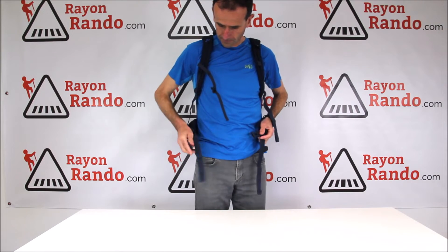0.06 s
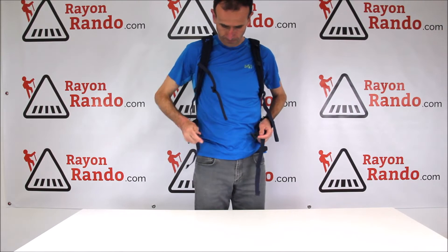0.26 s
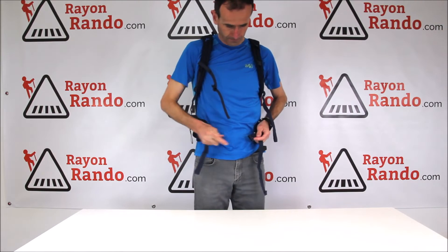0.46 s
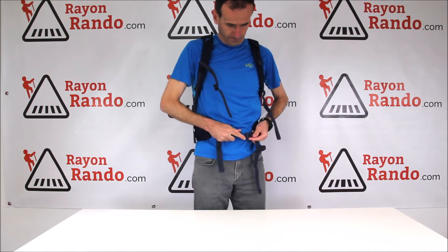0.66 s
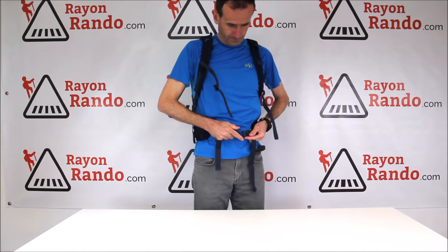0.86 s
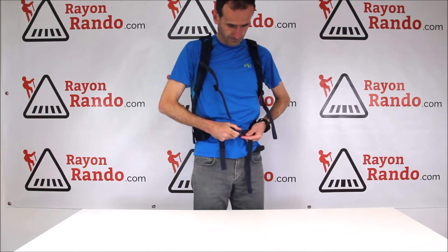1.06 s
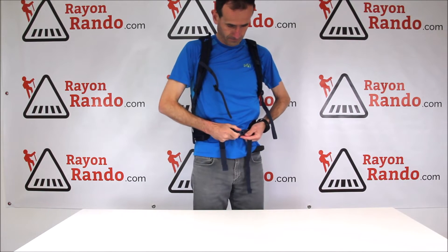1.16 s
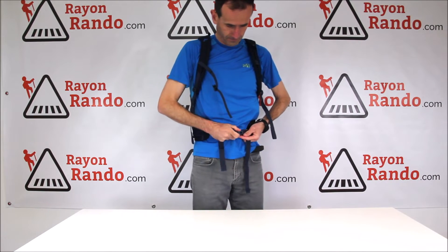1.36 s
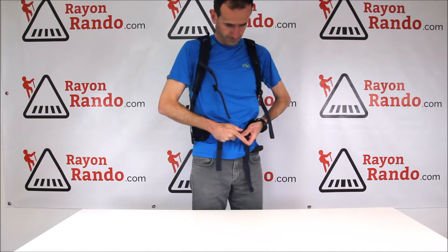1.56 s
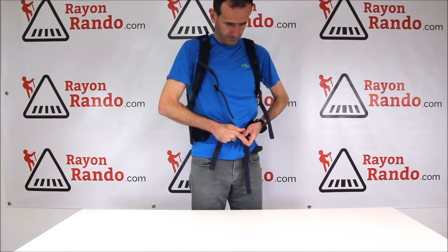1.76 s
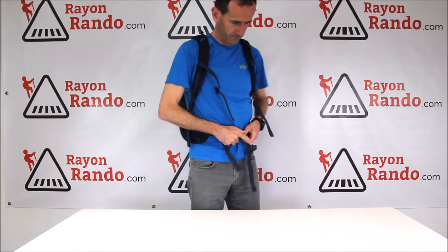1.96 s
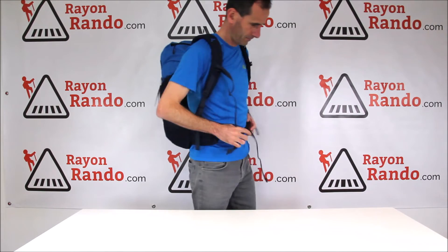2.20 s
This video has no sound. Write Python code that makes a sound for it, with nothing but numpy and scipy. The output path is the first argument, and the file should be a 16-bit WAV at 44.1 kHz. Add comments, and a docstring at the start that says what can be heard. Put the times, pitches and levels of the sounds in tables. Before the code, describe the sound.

Quiet fabric rustle and light plastic knocks lead to a sharp, clattering buckle snap, much louder than the rest; its short room echo fades into strap rustle and a tiny squeak, over low rumble and faint hiss.

```python
"""Webbing and clothes rustle softly in a bare room as someone draws a backpack's hip belt together.
Buckle halves tap and scuff as they line up, then the plastic prongs spring home in a burst of bright cracks.
The room rings on while the recorder's gain control ducks and recovers; the belt shifts with a tiny squeak.
Contacts are filtered clicks, fabric is grainy coloured noise, squeaks are resonant noise, bumps are low sines.
A decaying noise tail gives the room; rumble and microphone hiss lie underneath."""
import sys
import numpy as np
from scipy import signal
from scipy.fft import rfft, irfft
from scipy.io import wavfile
from scipy.ndimage import uniform_filter1d, minimum_filter1d

SR = 44100
rng = np.random.default_rng(int(sys.argv[2]) if len(sys.argv) > 2 else 0)


def persist_wave(psi):
    """Save psi, clipped to +-1, as 16-bit WAV."""
    counts = np.round(np.clip(psi, -1, 1) * 32767).astype(np.int16)
    wavfile.write(sys.argv[1], SR, np.atleast_2d(counts).T)


N = 98519  # samples in the scene

GRAINS_PER_S = 2500  # average rate of tiny slips in rustles and scuffs


def amp(db):
    """Decibels to gain."""
    return 10 ** (np.asarray(db) / 20)


def unit(x):
    """Scales to rms 1."""
    return x / np.sqrt(np.mean(x ** 2) + 1e-20)


def read(points, hz):
    """Reads a table on a log-frequency axis."""
    f, value = np.transpose(points)
    return np.interp(np.log(hz + 1), np.log(f + 1), value)


def add(mix, s, sound):
    """Mixes a sound in at time s, cut at the end of the scene."""
    part = mix[round(s * SR):][:len(sound)]
    part += sound[:len(part)]


def colour(x, points):
    """Gives a steady sound a spectrum."""
    hz = np.fft.rfftfreq(len(x), 1 / SR)
    return irfft(rfft(x) * amp(read(points, hz)), len(x))


def causal(x, db_at, size=4096):
    """Minimum-phase filter: shapes a click without smearing its attack backwards."""
    hz = abs(np.fft.fftfreq(size, 1 / SR))
    log_gain = np.log(amp(db_at(hz)))
    impulse = np.fft.ifft(np.exp(np.conj(signal.hilbert(log_gain)))).real
    return signal.fftconvolve(x, impulse[:size // 2])[:len(x)]


def octaves(hz, centre):
    """Distance from a centre frequency in octaves, held below 100 Hz."""
    return np.log2(np.maximum(hz, 100) / centre)


def burst(decay_s, size=4096):
    """A contact: one sharp pulse and a quickly dying chatter, energy about 1."""
    pulse_share = 0.14  # of the energy
    chatter = rng.choice([-1., 1.], size) * np.exp(-np.arange(size) / SR / decay_s)
    chatter[0] = 0
    chatter /= np.linalg.norm(chatter)
    pulse = signal.unit_impulse(size)
    return np.sqrt(pulse_share) * pulse + np.sqrt(1 - pulse_share) * chatter


def snap():
    """Prongs spring out and halves seat: short cracks coloured by the buckle's damped resonances."""
    # Each row: start in seconds, level in dB relative to crack_db, brightness in dB per octave.
    impacts = [(1.602, 1, .5), (1.6041, -1.5, -1), (1.6061, -3, -2), (1.6081, -3, 3.5), (1.6098, -11.5, 1)]
    # Resonances of the buckle. Each row: frequency in Hz, width in Hz, lift in dB.
    resonances = [(980, 150, 4), (1400, 350, 6), (2020, 220, 4), (3200, 500, 4), (3800, 400, 5),
                  (5180, 600, 7), (5450, 350, 6), (6320, 300, 5), (6850, 350, 5), (7500, 400, 4),
                  (10400, 400, 4), (12150, 500, 4), (14000, 400, 4), (14520, 400, 4)]
    # Basic spectrum of a crack. Each row: frequency in Hz, relative level in dB.
    crack_colour = [(60, -54), (200, -33), (400, -17.5), (800, -17), (1300, -10), (3000, -6), (6000, -2),
                    (9000, -1.5), (12000, 1), (15000, 3.5), (16200, -15)]
    crack_db, crack_decay_s = 14, 0.00096
    tilt_from_hz, tilt_pivot_hz = 960, 8300

    out = np.zeros(N)
    for s, db, tilt_db in impacts:
        def body(f):
            lift = 0
            for hz, width, lift_db in resonances:
                lift = lift + (amp(lift_db) - 1) / (1 + (2 * (f - hz) / width) ** 2)
            tilt = tilt_db * octaves(np.maximum(f, tilt_from_hz), tilt_pivot_hz)
            return read(crack_colour, f) + 20 * np.log10(1 + abs(lift)) + tilt
        crack = causal(burst(crack_decay_s), body)
        add(out, s, amp(crack_db + db) * crack)
    return out


def taps():
    """Fingers and buckle halves knock lightly, damped by the fingers into one resonance."""
    # Each row: start in seconds, level in dB (whole knock's energy), resonance in Hz, its width in Hz,
    # its strength in dB against the plain knock, treble rolloff in Hz.
    knocks = [(.591, -22, 640, 600, 14, 2500), (.614, -21.5, 2280, 1470, 24, 3970),
              (.708, -27, 900, 900, 0, 5000), (1.0801, -24.5, 2040, 1500, -4, 9000),
              (1.0839, -25, 1650, 500, 15, 5000), (1.0977, -23.5, 2730, 1200, 1, 8000),
              (1.3892, -17.5, 1216, 49.6, 25.5, 9000), (1.4865, -22, 2030, 1500, 4, 5000)]
    decay_s, low_hz = 0.0026, 349  # bass thins out below low_hz

    out = np.zeros(N)
    for s, db, hz, width, strength_db, dull_hz in knocks:
        def body(f):
            peak = 1 + amp(strength_db) / np.hypot(1, 2 * (f - hz) / width)
            treble = 1 / (1 + (f / dull_hz) ** 2)
            bass = (f + 1) / (f + low_hz)
            return 20 * np.log10(peak * treble * bass)
        knock = causal(burst(decay_s), body)
        add(out, s, amp(db) * knock / np.linalg.norm(knock))
    return out


def scuffs():
    """Webbing scrapes briefly on plastic: band-shaped random slips that rise fast and die away."""
    # Each row: start in seconds, rms level in dB before the fades, centre in Hz, decay constant in seconds.
    scrapes = [(0, -55, 2310, 0.042), (.592, -50, 606, 0.05), (.616, -45.5, 1940, .022),
               (1.085, -51.5, 1900, .015), (1.099, -51.5, 2860, 0.023), (1.395, -52.5, 644, 0.04),
               (1.489, -48.5, 3060, 0.018), (2.136, -47, 1570, 0.015)]
    width_octaves, rise_s = 0.93, 0.0044

    out, t = np.zeros(N), np.arange(SR // 4) / SR
    hz = np.fft.rfftfreq(len(t), 1 / SR)
    for s, db, centre_hz, decay_s in scrapes:
        slips = rng.standard_normal(len(t)) * (rng.random(len(t)) < GRAINS_PER_S / SR)
        band = np.exp(-(octaves(hz, centre_hz) / width_octaves) ** 2)
        scrape = unit(irfft(rfft(slips) * band, len(t)))
        envelope = np.minimum(t / rise_s, 1) * np.exp(-t / decay_s)
        add(out, s, amp(db) * scrape * envelope)
    return out


def squeaks():
    """Plastic squeaks under the tightened belt: noise through a narrow resonance makes a thin whistle."""
    # Each row: start in seconds, pitch in Hz, rms level in dB before the fades, decay constant in seconds.
    whistles = [(2.102, 12000, -53, .03), (2.118, 14650, -39, .006)]
    width_hz, rise_s = 250, .001

    out, t = np.zeros(N), np.arange(SR // 5) / SR
    radius = np.exp(-np.pi * width_hz / SR)
    for s, hz, db, decay_s in whistles:
        resonator = [1, -2 * radius * np.cos(2 * np.pi * hz / SR), radius ** 2]
        tone = unit(signal.lfilter([1], resonator, rng.standard_normal(len(t))))
        envelope = np.minimum(t / rise_s, 1) * np.exp(-t / decay_s)
        add(out, s, amp(db) * tone * envelope)
    return out


def rustle(levels, spectrum):
    """Fabric friction: many small fibre slips over a smooth hiss."""
    slip_share, spread_db = 0.71, 4  # slips' share of the energy, spread of their loudness
    struck = rng.random(N) < GRAINS_PER_S / SR
    strength = amp(spread_db * np.minimum(rng.exponential(1, N), 5))
    slips = unit(struck * rng.choice([-1., 1.], N) * strength)
    hiss = rng.standard_normal(N)
    drive = np.sqrt(slip_share) * slips + np.sqrt(1 - slip_share) * hiss
    level_db = np.interp(np.arange(N) / SR, *np.transpose(levels))
    return unit(colour(drive, spectrum)) * amp(level_db)


def webbing_slide():
    """Nylon webbing slides: the hissing layer of fabric friction."""
    # Each row: time in seconds, level in dB before the fabric mix.
    slide_levels = [(0, -56.5), (.1, -61.5), (.24, -57.5), (.34, -50.5), (.44, -57), (.56, -52.5),
                    (.68, -57.5), (.85, -64), (1.05, -63), (1.12, -66), (1.25, -86), (1.55, -60),
                    (1.9, -51.5), (2.0, -53.5), (2.08, -48.5), (2.17, -47), (2.23, -64)]
    # Each row: frequency in Hz, relative level in dB.
    slide_colour = [(200, -2), (900, -17.5), (1800, 0), (4200, -0.5), (6500, -5), (9000, -5), (13000, -4),
                    (16000, -16.5)]
    return rustle(slide_levels, slide_colour)


def clothes_rub():
    """Clothes and padding rub: the midrange layer of fabric friction."""
    # Each row: time in seconds, level in dB before the fabric mix.
    rub_levels = [(0, -63), (.12, -65.5), (.3, -56.5), (.56, -56), (.64, -51.5), (.74, -55), (.86, -65.5),
                  (1.05, -61), (1.12, -56.5), (1.24, -65), (1.36, -53.5), (1.41, -50), (1.47, -56),
                  (1.59, -54), (1.8, -62.5), (1.93, -47), (2.02, -62), (2.16, -47.5), (2.23, -52)]
    # Each row: frequency in Hz, relative level in dB.
    rub_colour = [(100, -25), (300, -12.5), (600, -7), (1300, -1.5), (1900, -3.5), (2800, -13.5),
                  (5000, -29.5), (15000, -28)]
    return rustle(rub_levels, rub_colour)


def pack_shift():
    """The pack shifts on the back: the low layer of fabric friction."""
    # Each row: time in seconds, level in dB before the fabric mix.
    shift_levels = [(0, -79), (.1, -75), (.3, -65), (.47, -56), (.56, -61.5), (.62, -55.5), (.76, -57.5),
                    (.87, -85), (1.07, -81), (1.12, -50.5), (1.24, -82), (1.36, -65), (1.41, -55.5),
                    (1.52, -64), (1.84, -79), (1.93, -63), (2.03, -68), (2.14, -61), (2.23, -75)]
    # Each row: frequency in Hz, relative level in dB.
    shift_colour = [(60, -50), (150, -8), (260, 2.5), (420, -2.5), (700, -13), (1500, -62), (8000, -72)]
    return rustle(shift_levels, shift_colour)


def bumps():
    """The wearer's weight shifts: soft low sines swell and fade as dull, rounded booms."""
    # Each row: start in seconds, pitch in Hz, peak level in dB, length in seconds.
    booms = [(.005, 182, -55.5, 0.06), (.69, 195, -56.5, 0.06), (1.885, 181, -57.5, .11),
             (2.155, 171, -56.5, 0.039)]
    out = np.zeros(N)
    for s, hz, db, length in booms:
        t = np.arange(0, length, 1 / SR)
        swell = np.sin(np.pi * t / length)
        tone = np.sin(2 * np.pi * (hz * t + rng.random()))
        add(out, s, amp(db) * swell * tone)
    return out


def room(x):
    """A dense noise tail that builds up quickly, each band dying at its own speed."""
    # Time to die away by 60 dB. Each row: frequency in Hz, time in seconds.
    decay_times = [(150, 0.66), (600, 0.44), (1500, 0.58), (3500, 0.48), (5400, 0.59), (8000, 0.46),
                   (11000, 0.39), (15000, 0.25)]
    # Spectrum at the start of the tail. Each row: frequency in Hz, relative level in dB.
    tail_colour = [(100, -8.5), (700, 0), (1500, -4.5), (3200, 4.5), (5400, 4.5), (9000, 2.5), (12000, 3.5),
                   (15000, 5)]
    delay_s, build_s = 0.0034, 0.0076

    hz, t, z = signal.stft(rng.standard_normal(SR), SR, nperseg=256)
    fall_db = 60 * t / read(decay_times, hz)[:, None]
    z = z * amp(read(tail_colour, hz)[:, None] - fall_db)
    tail = signal.istft(z, SR, nperseg=256)[1]
    tail = tail * np.clip((np.arange(len(tail)) / SR - delay_s) / build_s, 0, 1)
    return signal.fftconvolve(x, tail / np.linalg.norm(tail))[:N]


def floor():
    """Room rumble and microphone hiss: one steady coloured noise."""
    # Each row: frequency in Hz, relative level in dB.
    floor_colour = [(20, 0), (33, 2), (56, 15), (80, 9.5), (120, 0), (250, -2), (600, -4.5), (1800, -9),
                    (4000, -7), (9000, -11.5), (16000, -13)]
    floor_db = -57.5  # rms
    return amp(floor_db) * unit(colour(rng.standard_normal(N), floor_colour))


def scene():
    """Buckle and fabric, direct and through the room, over bumps and floor."""
    click, knocks, squeak = snap(), taps() + scuffs(), squeaks()
    fabric = (webbing_slide() + clothes_rub() + pack_shift()) / np.sqrt(2)
    # room sends in dB
    sent = amp(-3.5) * click + amp(-4.5) * knocks + amp(-4) * squeak + amp(0.5) * fabric
    direct = click + knocks + squeak + fabric + bumps()
    return (direct + room(sent) + floor())[None]


def record(dry):
    """Gain control drops fast on loud sound, holds and recovers; then clipping and a treble limit."""
    limit_db, slope, hold_s = -14.5, 0.63, 0.032  # slope: dB of ducking per dB over the limit
    over_fall = 147  # dB per second by which the remembered excess falls, before the slope
    edge_hz = 15950

    power_db = 10 * np.log10(abs(uniform_filter1d(dry[0] ** 2, size=64)) + 1e-12)
    over_db = np.maximum(power_db - limit_db, 0)
    hold = 2 * int(hold_s * SR / 2) + 1
    # the largest excess within the past hold time
    held = -minimum_filter1d(-over_db, hold, origin=hold // 2)
    fall = np.arange(N) * over_fall / SR
    # a running maximum on a rising ramp gives a straight-line recovery
    remembered = np.maximum.accumulate(held + fall) - fall
    duck_db = slope * uniform_filter1d(remembered, size=64)
    out = np.clip(dry * amp(-duck_db), -1, 1)
    lowpass = signal.firwin(255, edge_hz, window=("kaiser", 8), fs=SR)
    return signal.oaconvolve(out, lowpass[None], "same")


dry = scene()
out = record(dry)
persist_wave(out)
```